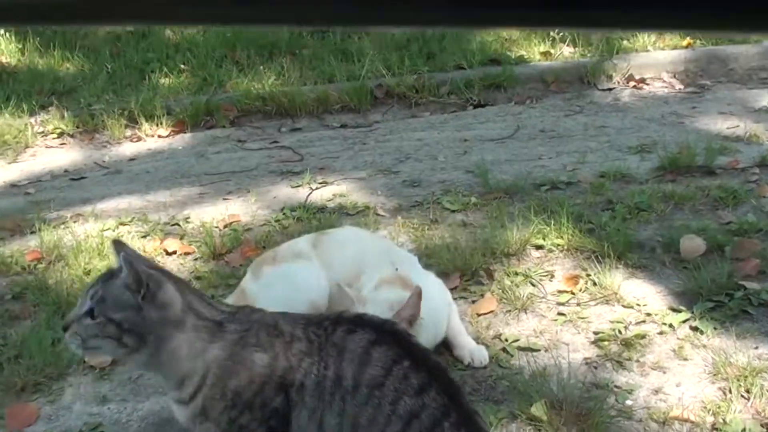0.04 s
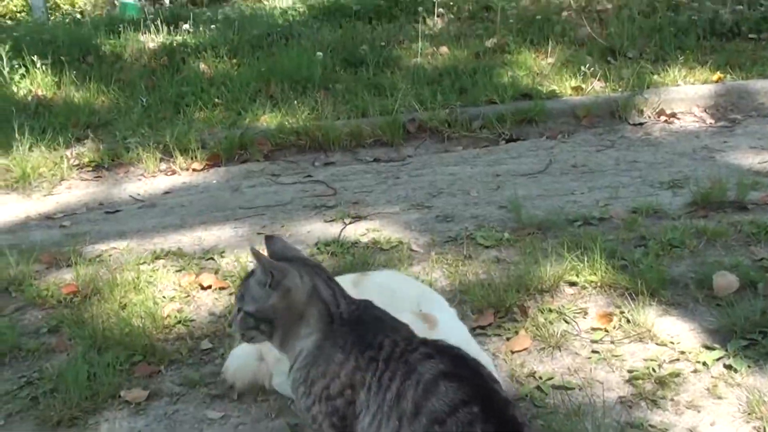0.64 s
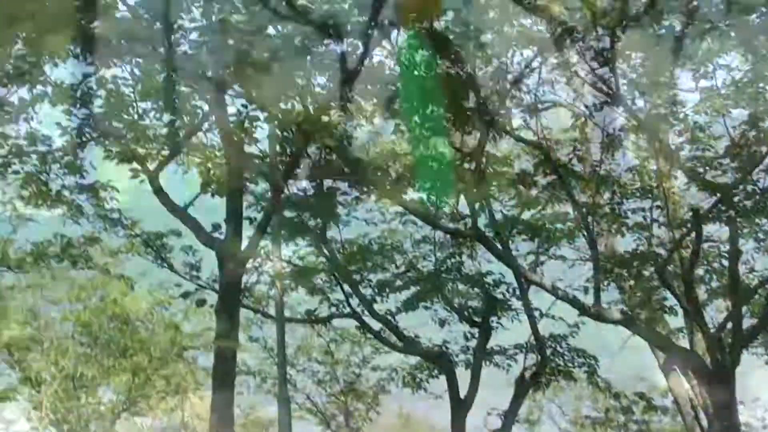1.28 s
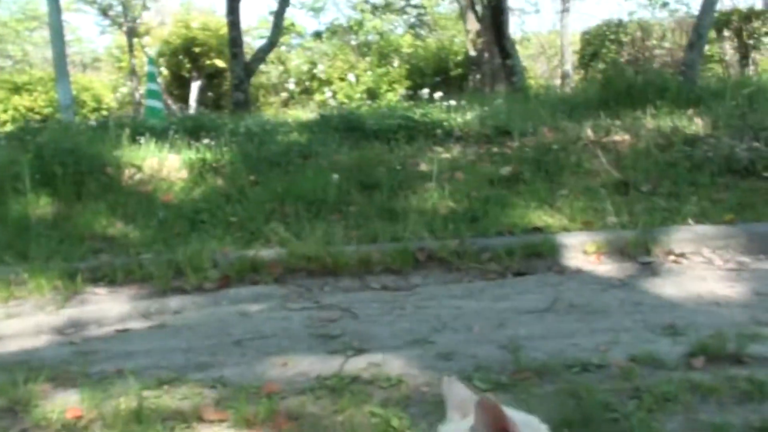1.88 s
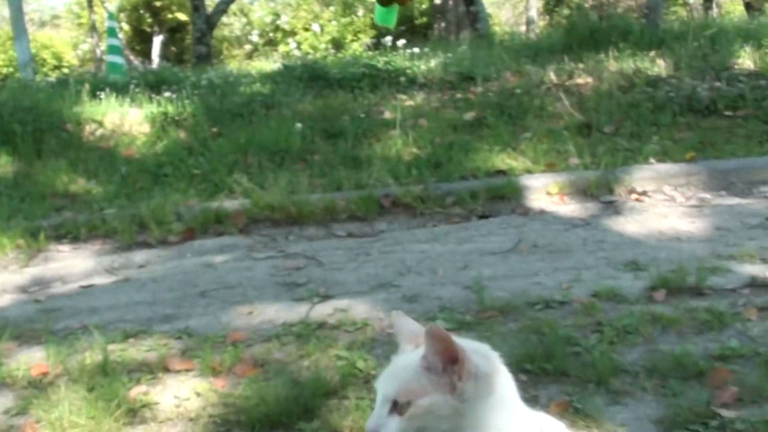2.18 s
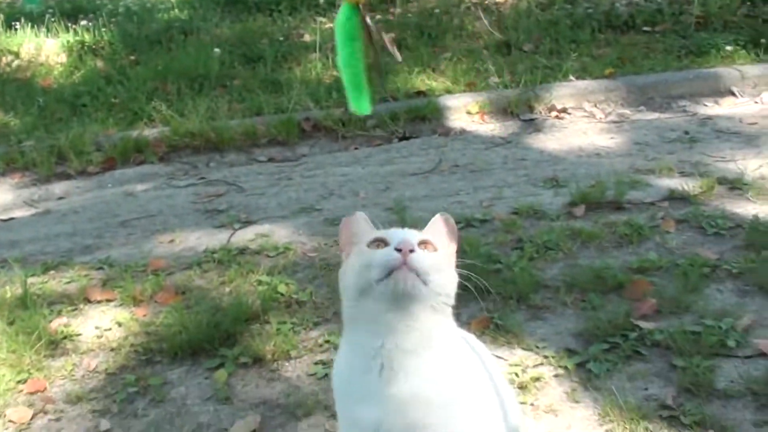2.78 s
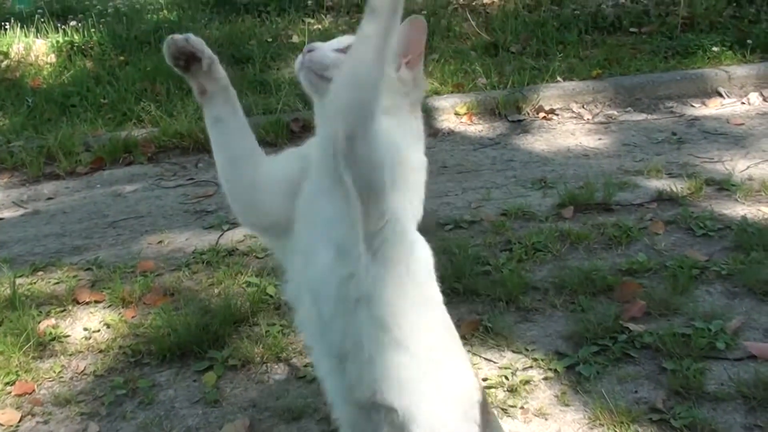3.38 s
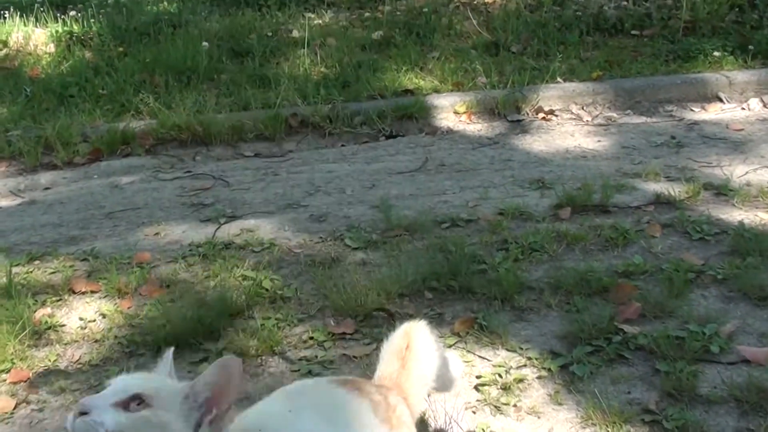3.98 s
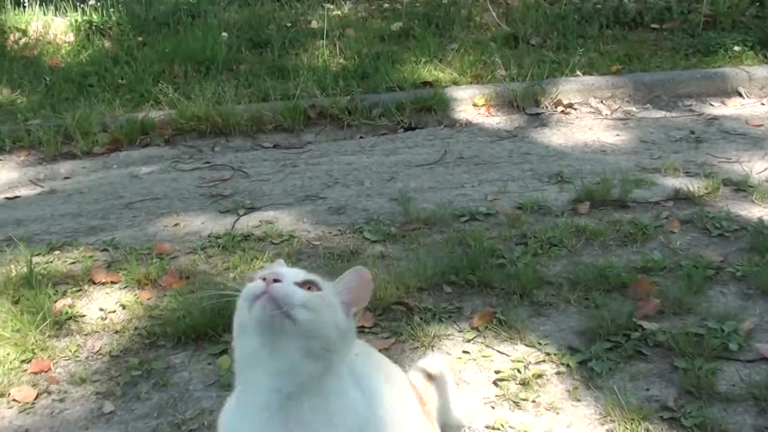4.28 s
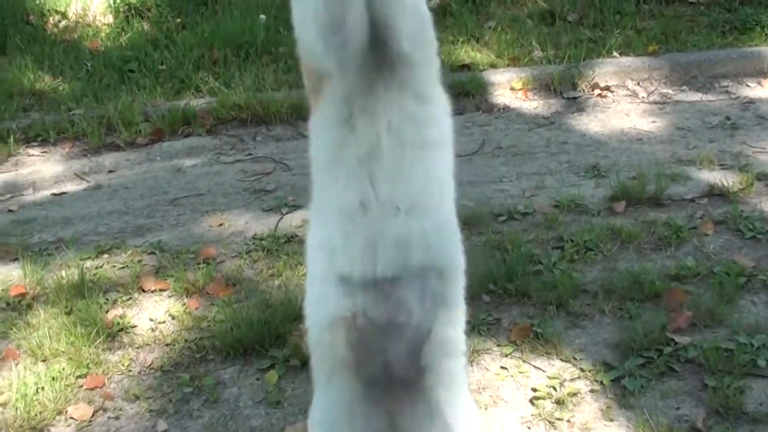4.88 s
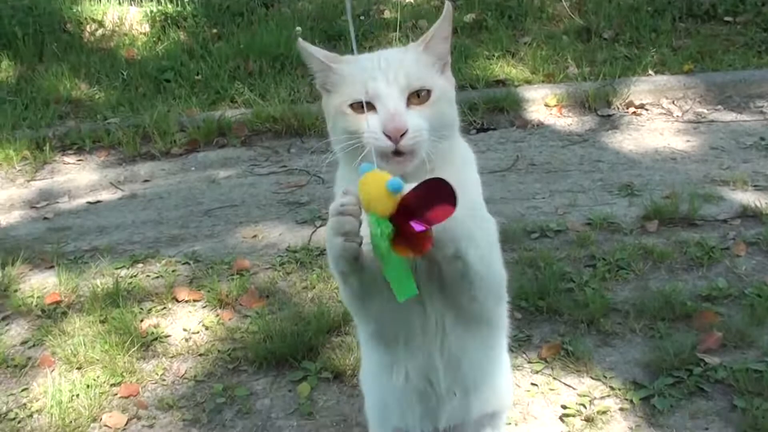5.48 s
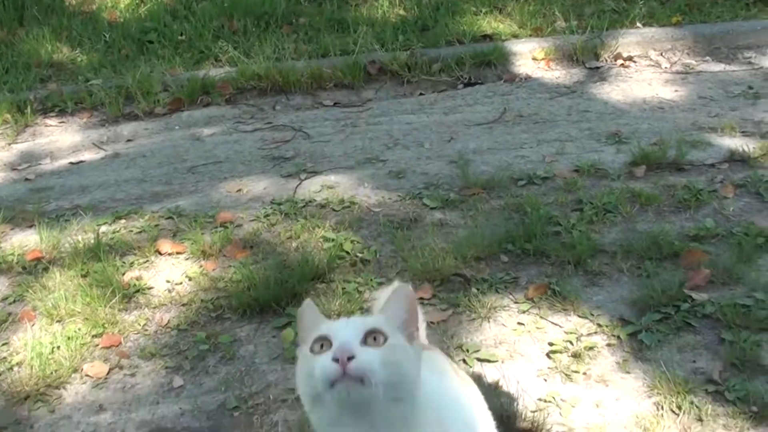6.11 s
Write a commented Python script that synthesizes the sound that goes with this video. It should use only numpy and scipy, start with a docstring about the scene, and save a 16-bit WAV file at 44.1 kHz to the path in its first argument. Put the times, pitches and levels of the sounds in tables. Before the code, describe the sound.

In a quiet park, a plastic toy wand clacks several times close to the stereo microphone, with soft sleeve rubbing and a hollow knock on the grip. Kittens scuff lightly on dirt and dry leaves straight ahead. Then their paws catch the foil toy, which crinkles sharply, first briefly and later in two longer, louder flurries. Faint birds chirp far away.

```python
"""Kittens and a foil toy in a park

Straight ahead of a stereo microphone, kittens play on dirt and dry leaves under a toy on a wand.
Its foil wings buckle and crinkle sharply whenever a paw catches them, and paws scuff the ground.
Close to the microphone the plastic wand clacks, the grip knocks and creaks, a sleeve rubs as the toy
is swung and a hand shifts on the camera. Far off, birds chirp over the quiet air of the park."""
import sys
import numpy as np
from scipy import signal
from scipy.fft import rfft, irfft, next_fast_len
from scipy.io import wavfile
from scipy.ndimage import uniform_filter1d

SR = 44100
rng = np.random.default_rng(int(sys.argv[2]) if len(sys.argv) > 2 else 0)


def to_wav(s):
    """Save 16-bit WAV."""
    ch = np.atleast_2d(s).T  # columns
    pcm = np.round(np.clip(ch, -1, 1) * 32767)  # PCM
    wavfile.write(sys.argv[1], SR, pcm.astype(np.int16))


N = 275625
TIME, FREQS = np.arange(N) / SR, np.fft.rfftfreq(N, 1 / SR)
FILTER_HZ = abs(np.fft.fftfreq(1024, 1 / SR))


def wings(ring_db=-12, graze_lead_s=.007, graze_db=-21, soft_tilt=-2.5):
    """Paws graze, buckle and hold the foil wings; every crumple sets the whole wing ringing."""
    # sharp crumples under a paw: crest_s, level_db, length_s, tilt_db_per_octave
    crinkles = [(3.539, -15.5, .012, 0.5), (3.553, -25.5, 0.017, -4), (3.566, -21, 0.0087, -1),
                (3.578, -22.5, 0.011, -2), (4.835, -10.5, 0.0074, -1.5), (4.858, -14, 0.013, -.5),
                (4.879, -26.5, .007, -5), (4.974, -23.5, 0.0093, 0), (4.99, -22, 0.0045, 0.5),
                (5.033, -26, 0.013, -2.5), (5.064, -28.5, 0.0033, -2.5), (5.128, -33, .0033, 8),
                (5.143, -22.5, .003, 1), (5.429, -30, .0027, 0), (5.446, -38, 0.006, 1),
                (5.547, -35, 0.02, -3), (5.661, -34, .005, -6.5), (5.876, -14, 0.0079, 3),
                (5.966, -16, 0.0062, 3), (5.974, -12, .0095, 0.5), (5.986, -20.5, .011, -5),
                (6.01, -23, 0.011, -6.5), (6.021, -11, .01, 0), (6.073, -18.5, 0.0084, 5.5),
                (6.1, -19.5, .005, -0.5), (6.111, -21, .013, 1.5), (6.147, -28, 0.015, -1.5),
                (6.227, -31.5, .011, -3)]
    # rustling while a kitten holds on: start_s, end_s, level_db, crumple_length_s
    rustles = [(4.843, 4.97, -31.5, .013), (5.074, 5.095, -37, .009), (5.153, 5.191, -39.5, .003),
               (5.343, 5.505, -44, .005), (5.567, 5.591, -38, .008), (5.82, 5.872, -38, .014),
               (6.045, 6.25, -39, .013)]
    # resonances of the wings: pitch_hz, level_db, t60_s
    wing_modes = [(3800, -30, .025), (4600, -41.5, 0.033), (6650, -27, 0.014), (7240, -48, 0.022),
                  (7680, -20, 0.0072), (9300, -39, .02)]
    out = np.zeros(N)
    for s, db, length, tilt in crinkles:
        add(out, *crinkle(s, db, length, tilt))
        add(out, *crinkle(s - graze_lead_s, db + graze_db, length, soft_tilt))
    for start, end, db, length in rustles:
        for s in scatter(start, end, gap_s=.016):
            force, stretch, shine = rng.standard_normal(3)
            add(out, *crinkle(s, db + 3 * force, length * 2 ** (.5 * stretch), soft_tilt + 1.9 * shine))
    ringing = signal.fftconvolve(out, ring(wing_modes, TIME[:SR // 10]))[:N]
    return out + amp(ring_db) * ringing


def crinkle(s, db, length, tilt, fold_hz=7330, hard_db=-15, glancing_s=.0043):
    """The foil buckles once: snaps ring the fold and a few small facets. Returns start and sound."""
    # spectrum of the foil: frequency_hz, density_db
    foil = [(60, -25), (200, -12.5), (700, -13), (1300, -11.5), (2000, -8), (3000, -5.5), (4000, -2.5),
            (6000, -1.5), (8500, -1), (10500, -7), (13000, -10), (16000, -15)]
    rise, softness_db = .38 * length, hard_db - db
    # the softer the touch, the more the fold's own ring stands out
    fold_db = (6 + .099 * softness_db) * peak(fold_hz * (1 + .052 * rng.standard_normal()), 2200)
    facets_db = 6 * np.max([peak(hz, 350) for hz in rng.uniform(3800, 11880, size=8)], axis=0)
    # only the hardest blows crack the foil sharply enough to fill the top octave
    crack_db = 6 * peak(12700, 4800) / (1 + amp(7.8 * softness_db))
    # a slow, glancing touch slides and hisses more than it snaps
    slide = .25 + (rise / glancing_s) ** 2 / 2
    swarm = crumple(rise, length - rise, snaps_per_s=4000, spread_db=35, slide=slide)
    sound = signal.fftconvolve(swarm, colour(foil, tilt, fold_db + facets_db + crack_db))
    return s - 2 * rise, amp(db) * sound * np.linalg.norm(swarm) / np.linalg.norm(sound)


def crumple(rise, fall, snaps_per_s, spread_db, slide):
    """Tiny snaps of uneven size over a sliding hiss swell for twice the rise, then die away."""
    t = np.arange(-2 * rise, 10 * fall, 1 / SR)
    swell = np.where(t < 0, np.exp(-(t / rise) ** 2), np.exp(-abs(t) / fall))
    chance, size, side = rng.random((3, len(t)))
    snaps = (chance < snaps_per_s / SR) * amp(spread_db * size) * np.sign(side - .5)
    swarm = swell * (evened(snaps) + slide * rng.standard_normal(len(t)))
    return swarm * np.linalg.norm(swell) / np.linalg.norm(swarm)


def wand(crack_db=8, crack_s=.0022, rise_s=.00037, detune=.017):
    """Loose plastic clacks close by: a short crack and modes that shift with the hold of the hand."""
    # clacks of the wand: start_s, peak_db, tilt_db_per_octave
    clacks = [(0.9367, -16.5, -2), (1.1156, -31, 8), (1.1963, -16.5, 1), (1.3916, -22, -0.5),
              (1.44, -28.5, -4), (1.544, -27, 3.5), (1.648, -35, 9), (1.8182, -30.5, 6)]
    # resonances of the plastic: pitch_hz, level_db, t60_s
    wand_modes = [(370, -20.5, 0.064), (960, -6, 0.033), (1250, -26, 0.019), (1810, -15, 0.047),
                  (2343, 0, 0.028), (2737, -3.5, .018), (3280, -5.5, 0.029), (3990, -5, 0.018),
                  (4530, 0, 0.019), (4950, 4, 0.0099), (5820, 0.5, 0.01), (6420, -1, 0.014),
                  (8050, -3, 0.0066)]
    out, t = np.zeros(N), TIME[:SR // 10]
    for s, db, tilt in clacks:
        hold = rng.standard_normal((len(wand_modes), 2))
        modes = [(hz * (1 + detune * bend), level + uneven_db, t60)
                 for (hz, level, t60), (bend, uneven_db) in zip(wand_modes, hold)]
        crack = burst(t, crack_s, band_hz=[800, 6500])
        clack = (ring(modes, t) + amp(crack_db) * crack) * (1 - np.exp(-t / rise_s))
        clack = signal.fftconvolve(clack, colour([(1, 0)], tilt))
        add(out, s, amp(db) * clack / abs(clack).max())
    return out


def grip(creak_hz=612, creak_octaves=.46, bounce_s=.0058, bounce_db=-17):
    """A knock is a few damped cycles with a tick on top and a weak rebound; a creak is a run of them."""
    # hollow knocks: start_s, level_db, pitch_hz; the first is the low thud under the wand's first clack, the
    # others are the hand on the grip
    knocks = [(0.9381, -39, 364), (2.4375, -18.5, 1113), (4.8263, -21.5, 1119)]
    # creaks as the hand tightens: start_s, end_s, level_db
    creaks = [(1.691, 1.735, -42.5), (4.649, 4.71, -35), (4.745, 4.82, -39)]
    out, t = np.zeros(N), TIME[:SR // 10]
    small_knocks = [(s, db, creak_hz * 2 ** (creak_octaves * rng.standard_normal()))
                    for start, end, db in creaks for s in scatter(start, end, gap_s=.018)]
    for s, db, hz in knocks + small_knocks:
        crest_s = 1.02 / hz
        body = t / crest_s * np.exp(1 - t / crest_s) * np.sin(2 * np.pi * hz * t)
        tick = burst(t, decay_s=.0018, band_hz=[1500, 6500])
        tick_db = -4 + 1.5 * np.log2(hz / 1000)  # duller knocks tick less
        knock = amp(db) * (body + amp(tick_db) * tick / abs(tick).max())
        add(out, s, knock)
        add(out, s + bounce_s, amp(bounce_db) * knock)
    return out


def paws():
    """Claws drag through grit and leaves in short swarms of snaps and hiss."""
    # scuffs on the ground: crest_s, level_db, length_s, tilt_db_per_octave
    scuffs = [(0.217, -51, .038, 8), (0.625, -51.5, 0.033, 3.5), (0.769, -54.5, .035, 15),
              (3.125, -50.5, 0.025, 6.5), (3.262, -40, 0.0082, 2), (3.285, -48.5, 0.023, 2),
              (3.339, -55.5, 0.035, 13), (3.708, -46.5, .016, 15.5), (3.859, -45.5, .01, -2),
              (3.942, -46, .03, 15), (3.998, -45, .0095, 2), (4.164, -45.5, .0135, -2)]
    # spectrum of dirt and dry leaves: frequency_hz, density_db
    dirt = [(200, -14), (700, 4), (1300, 4.5), (2600, 6), (4500, 3), (7000, -1), (10000, -14.5),
            (16000, -46)]
    out = np.zeros(N)
    for s, db, length, tilt in scuffs:
        rise = .3 * length
        swarm = crumple(rise, length - rise, snaps_per_s=1400, spread_db=23, slide=.48)
        add(out, s - 2 * rise, amp(db) * signal.fftconvolve(swarm, colour(dirt, tilt)))
    return out


def sleeve(grain=.3):
    """Cloth beside the microphone hisses as it slides, catching unevenly on its weave."""
    # light brushes of the sleeve: start_s, length_s, level_db, tilt_db_per_octave
    brushes = [(1.359, 0.19, -56, 0), (1.474, .14, -48.5, 0.5), (1.811, 0.16, -55.5, 4.5),
               (2.099, 0.273, -55, -0.5), (2.569, 0.079, -53.5, 0)]
    # spectrum of lightly brushed cloth: frequency_hz, density_db
    cloth_soft = [(250, -35), (700, -13), (1150, 2.5), (1700, -6), (2400, 1), (3500, -1), (5000, -1),
                  (6500, -2), (9000, -11), (15000, -40)]
    brushing = np.zeros(N)
    for s, length, db, tilt in brushes:
        hiss = signal.fftconvolve(rng.standard_normal(round(length * SR)), colour(cloth_soft, tilt))
        add(brushing, s, amp(db) * hiss * signal.windows.tukey(len(hiss), .2))
    sliding = brushing + swing()
    catches = evened(uniform_filter1d(rng.standard_normal(N), size=130))
    return sliding * np.exp(grain * catches)


def swing(start_s=4.19, peak_s=4.73, attack_s=.032, growth_db_per_s=30, brake_db_per_s=130):
    """The sleeve hisses and fizzes as the arm lowers the toy, gathering speed, then braking."""
    # spectrum of fast-sliding cloth: frequency_hz, density_db
    cloth_fast = [(200, -19), (480, 3.5), (800, -1), (1500, -2), (2400, -2), (3400, -4.5), (5000, 0),
                  (6500, 4), (8000, -1.5), (9500, -10), (11500, -25), (16000, -21)]
    past_peak = TIME - peak_s
    speed = amp(-39.5 + np.minimum(growth_db_per_s * past_peak, -brake_db_per_s * past_peak))
    speed *= np.clip((TIME - start_s) / attack_s, 0, 1)
    fibres = rng.standard_normal(N) * (rng.random(N) < 160 / SR)  # single threads snag and let go
    fizz = evened(signal.lfilter(*signal.butter(3, [5500, 10500], "band", fs=SR), fibres))
    return speed * (noise(cloth_fast, patchy_db=-.5) + amp(-10) * fizz)


def handling(crossfeed=.42):
    """Handling noise: the hand shifts on the camera in dull swells of rumble."""
    # shifts of the hand: crest_s, half_length_s, level_db, upper_edge_hz
    shifts = [(1.695, 0.032, -46.5, 165), (1.767, 0.05, -50.5, 187), (1.937, 0.34, -55, 1030),
              (6.014, 0.044, -54, 188)]
    out = np.zeros((2, N))
    for s, width, db, edge_hz in shifts:
        band = signal.butter(2, [edge_hz / 3, edge_hz], "band", fs=SR, output="sos")
        rub = signal.sosfilt(band, rng.standard_normal((2, N)))
        out += amp(db) * evened(rub + crossfeed * rub[::-1]) * np.exp(-((TIME - s) / width) ** 2)
    return out


def birds(rasp_hz=230, glide=-.02):
    """Raspy chirps from distant trees: slightly falling notes whose strength and phase flutter."""
    # faint chirps: start_s, length_s, pitch_hz, level_db
    chirps = [(0.196, 0.04, 4350, -51), (0.263, 0.062, 4280, -57), (3.104, 0.047, 4350, -62),
              (3.11, .045, 5595, -64), (3.313, 0.059, 4350, -63), (3.799, .085, 2550, -56.5),
              (4.238, 0.057, 2520, -52.5)]
    out = np.zeros(N)
    for s, length, hz, db in chirps:
        progress = np.linspace(0, 1, round(length * SR))
        flutter = signal.lfilter(*signal.butter(2, rasp_hz, fs=SR), rng.standard_normal((2, len(progress))))
        phase = 2 * np.pi * np.cumsum(hz * (1 + glide * progress)) / SR
        note = evened(flutter[0] * np.cos(phase) + flutter[1] * np.sin(phase))
        add(out, s, amp(db) * np.sin(np.pi * progress) * note)
    return out + amp(-17) * park(out)


def park(x, apart=.081):
    """Scattered echoes off ground and trees, a little different each side, the treble dying first."""
    # decay of the echoes: frequency_hz, t60_s
    decay = [(300, 0.53), (2000, 0.53), (7000, 0.23), (15000, 0.031)]
    n = SR // 2
    mid, side = rng.standard_normal((2, n)) * (rng.random((2, n)) < 4000 / SR)
    taps = np.array([mid + apart * side, mid - apart * side]) * (TIME[:n] > .004)
    hz, t, spectrum = signal.stft(taps, SR, nperseg=256)
    tail = signal.istft(spectrum * amp(-60 * t / read(decay, hz)[:, None]), SR, nperseg=256)[1]
    return signal.fftconvolve(x[None], tail / np.linalg.norm(tail[0]), axes=1)[:, :N]


def air(level_db=-53):
    """The still air of the park: a faint, wide hush."""
    # spectrum of the ambience: frequency_hz, density_db
    hush = [(15, -11), (25, -14), (74, -6), (137, -2), (217, -3), (309, -2), (335, -3), (560, -7),
            (1190, -9), (1700, -11.5), (2350, -13), (4870, -14.5), (5880, -14.5), (13600, -21.5),
            (16000, -21)]
    return amp(level_db) * noise(hush, patchy_db=1.0)


def noise(points, patchy_db, size=512):
    """Stereo noise of a given spectrum, with drifting patches and partly alike channels."""
    # likeness of left and right: frequency_hz, correlation
    likeness = [(60, 0.97), (180, 0.96), (550, 0.49), (1650, 0.39), (4970, 0.81), (15000, 1)]
    hz = np.fft.rfftfreq(size, 1 / SR)
    a, b, c, d, patches = rng.standard_normal((5, 4 * N // size + 5, len(hz)))
    patches = evened(uniform_filter1d(uniform_filter1d(patches, size=16, axis=0), size=10, axis=1))
    same = np.clip(read(likeness, hz), -1, 1)
    left = a + 1j * b
    right = same * left + np.sqrt(1 - same ** 2) * (c + 1j * d)
    frames = np.array([left, right]) * amp(patchy_db * patches)
    white = signal.istft(frames, nperseg=size, noverlap=size - size // 4, time_axis=1, freq_axis=2)[1]
    return evened(irfft(rfft(white[:, :N]) * amp(read(points, FREQS)), N))


def stereo_pair(x, side_db):
    """The two microphones hear a near sound slightly out of step."""
    side = amp(side_db) * signal.hilbert(x, next_fast_len(N)).imag[:N]
    return x + np.array([side, -side])


def colour(points, tilt, peaks_db=0):
    """Causal response of unit energy: a spectrum, tilted above the midrange, with optional peaks."""
    gain_db = read(points, FILTER_HZ) + tilt * np.log2(np.clip(FILTER_HZ, 2500, 13000)) + peaks_db
    minimum_phase = np.exp(np.conj(signal.hilbert(np.log(amp(gain_db)))))
    response = np.fft.ifft(minimum_phase).real[:len(FILTER_HZ) // 2]
    return response / np.linalg.norm(response)


def ring(modes, t):
    """Dying sines of random phase."""
    return sum(amp(db - 60 * t / t60) * np.sin(2 * np.pi * (hz * t + rng.random()))
               for hz, db, t60 in modes)


def burst(t, decay_s, band_hz):
    """A dying burst of band-limited noise."""
    dying = rng.standard_normal(len(t)) * np.exp(-t / decay_s)
    return signal.lfilter(*signal.butter(2, band_hz, "band", fs=SR), dying)


def peak(hz, width_hz):
    """Bell-shaped resonance curve of height one."""
    return 1 / (1 + (2 * (FILTER_HZ - hz) / width_hz) ** 2)


def scatter(start, end, gap_s):
    """Uneven moments from start to about end, one in every gap."""
    slots = np.arange(start, end - gap_s / 2, gap_s)
    return slots + gap_s * rng.random(len(slots))


def amp(db):
    """Decibels to gain."""
    return 10 ** (np.asarray(db) / 20)


def evened(x):
    """Scales to an rms of one."""
    return x / np.sqrt(np.mean(x ** 2) + 1e-20)


def read(points, hz):
    """Reads a table on a logarithmic frequency axis."""
    f, value = np.transpose(points)
    return np.interp(np.log(hz + 1), np.log(f + 1), value)


def add(mix, s, sound):
    """Mixes a sound in at time s."""
    part = mix[max(round(s * SR), 0):][:len(sound)]
    part += sound[:len(part)]


def scene():
    """Toy and paws straight ahead; the hand-held wand is too close to the microphone to echo much."""
    kittens, hand = wings() + paws(), wand() + grip()
    echoes = park(amp(-20) * kittens + amp(-27) * hand)
    ambience = air()
    direct = stereo_pair(kittens + hand, side_db=-19.5)
    return direct + echoes + sleeve() + handling() + birds() + ambience


def record(dry):
    """The sharpest snaps overload the recorder softly; its band ends at 16 kHz."""
    ceiling = .6
    squashed = ceiling * np.tanh(dry / ceiling)
    lowpass = signal.firwin(511, 16000, window=("kaiser", 9), fs=SR)
    return signal.oaconvolve(squashed, lowpass[None], "same")


dry = scene()
out = record(dry)
to_wav(out)
```